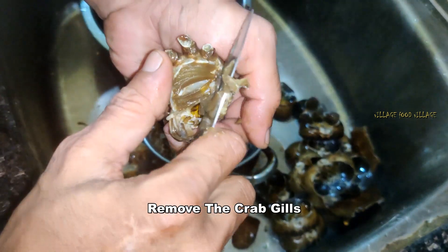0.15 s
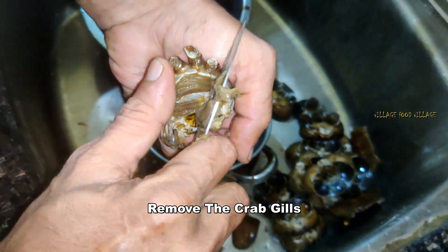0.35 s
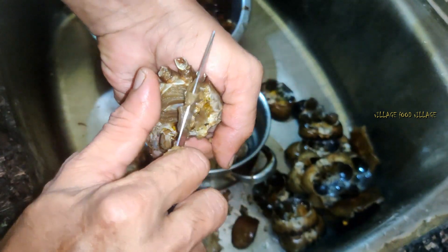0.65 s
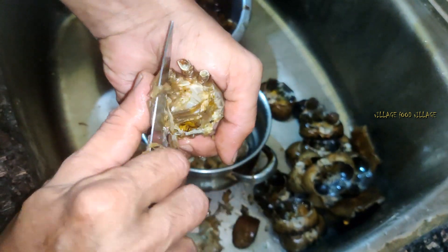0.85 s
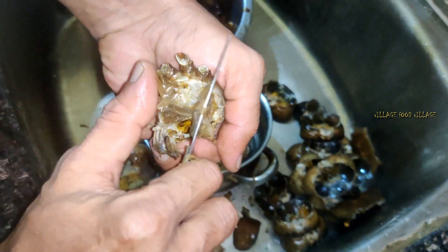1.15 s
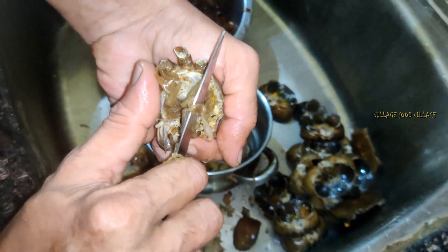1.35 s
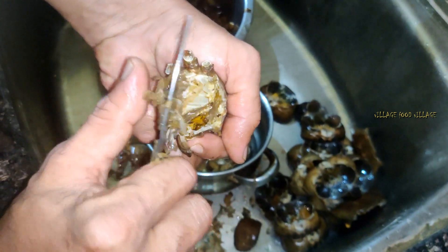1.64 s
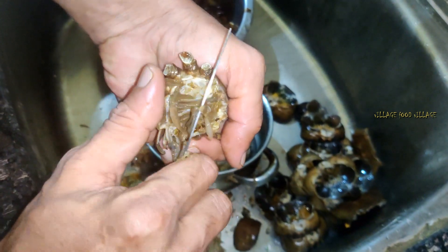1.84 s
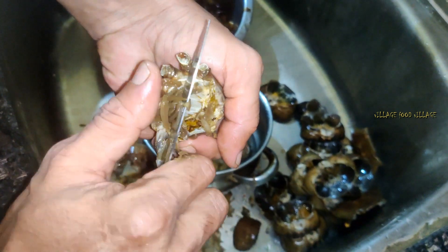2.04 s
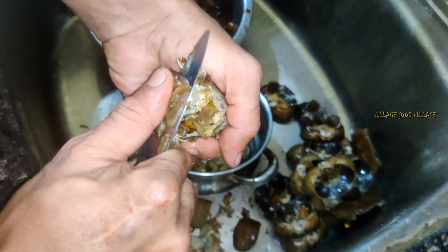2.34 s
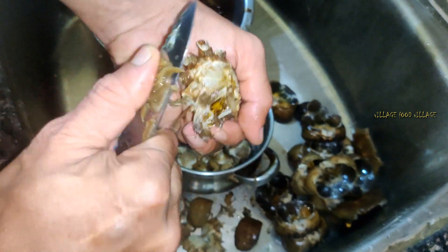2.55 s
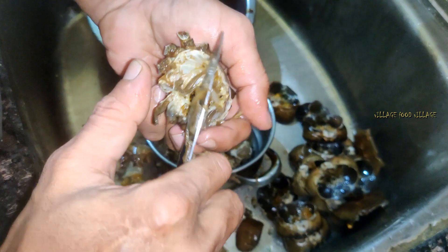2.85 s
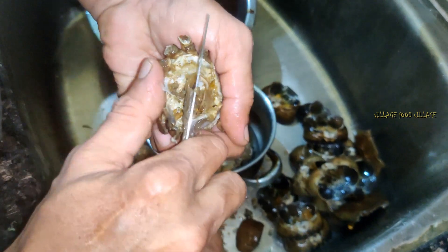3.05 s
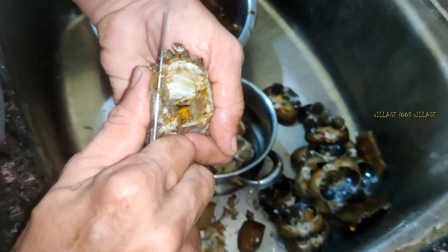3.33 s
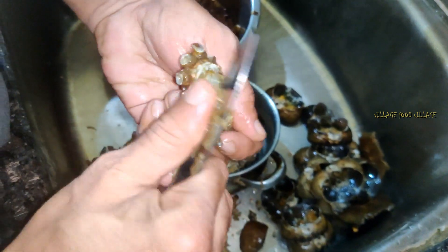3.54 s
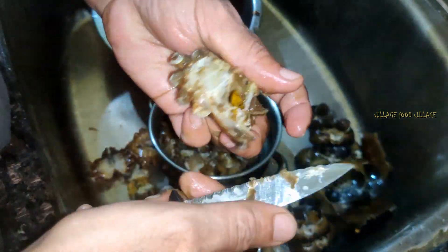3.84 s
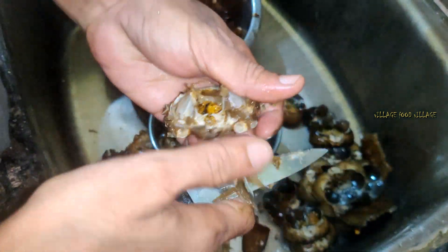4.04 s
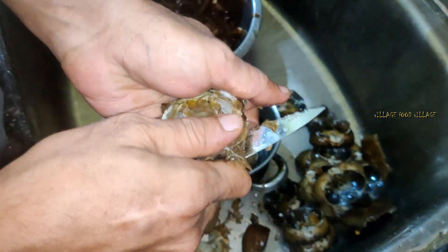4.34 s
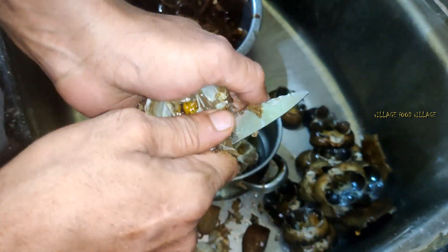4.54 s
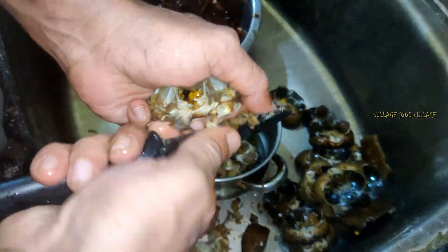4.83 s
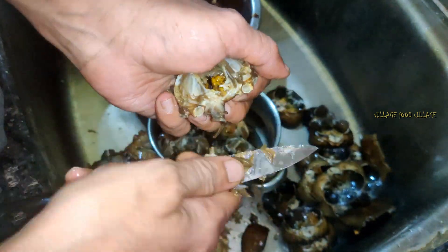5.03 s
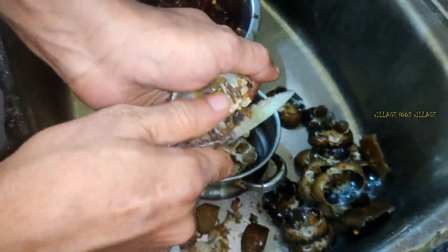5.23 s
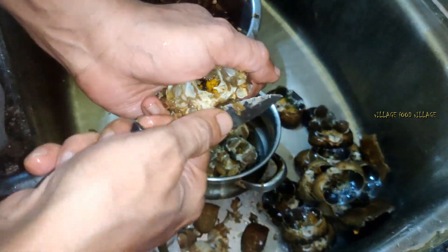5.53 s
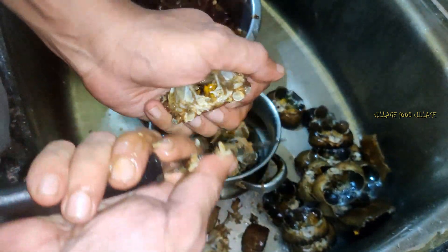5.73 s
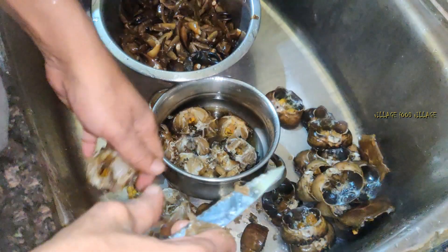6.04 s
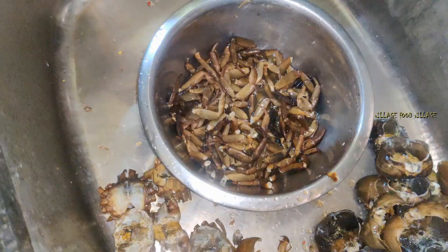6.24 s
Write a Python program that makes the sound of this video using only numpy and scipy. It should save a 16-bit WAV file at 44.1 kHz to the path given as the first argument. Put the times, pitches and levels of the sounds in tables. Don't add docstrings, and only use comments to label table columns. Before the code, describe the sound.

Steady hum and hiss with faint passing traffic. Close up, a blade chips and breaks small crab shells, giving dry, crisp, hollow-ringing cracks scattered left and right, with brief scratchy rubs between. Two soft knocks of dropped scraps echo from farther off. After the last hard snaps comes a quick flurry of wooden pounder blows on stone, heavy and dull, abruptly cut to bare background. The hard kitchen adds a short echo.

```python
import sys
import numpy as np
from scipy import signal
from scipy.fft import rfft, irfft
from scipy.io import wavfile
from scipy.ndimage import uniform_filter1d

SR = 44100
rng = np.random.default_rng(int(sys.argv[2]) if len(sys.argv) > 2 else 0)


def gain_from_db(level_db):
    decades = np.asarray(level_db, float) / 20
    return 10 ** decades


def pcm_store(signal):
    levels = np.round(np.clip(np.atleast_2d(signal), -1, 1) * 32767)
    wavfile.write(sys.argv[1], SR, levels.astype(np.int16).T)


N = 281358
CUT_S = 6.2685

# start_s, peak_db, heavy_thud_db, crack_db, contact_brightness_hz
POUNDER_BLOWS = [
    (6.1943, -11.5, -19, -14, 800),
    (6.203, -13.5, -7, -11, 645),
    (6.2373, -14, 13.5, -16, 3060),
    (6.2366, -14, 11, 7.5, 2520),
    (6.25, -20, -1, -10, 2520),
    (6.264, -16, -6, -3, 2510),
]


def rms_one(x):
    return x / np.sqrt(np.mean(x ** 2) + 1e-20)


def at_hz(points, hz):
    pitch_hz, value = np.array(points)[:, 0], np.array(points)[:, 1]
    return np.interp(np.log(hz + 1), np.log(pitch_hz), value)


def drift(rate):
    r = np.exp(-80 * np.pi * rate / SR)
    slow = signal.lfilter([1], [1, -2 * r, r * r], rng.standard_normal(N // 40 + 2002))
    slow = rms_one(slow[2000:])
    return np.interp(np.arange(N) / 40, np.arange(len(slow)), slow)


def band(x, low_hz, high_hz):
    return signal.sosfilt(signal.butter(2, [low_hz, high_hz], "band", fs=SR, output="sos"), x)


def ring(clicks, hz, t60):
    r, w = gain_from_db(-60 / (t60 * SR)), 2 * np.pi * hz / SR
    return signal.lfilter([0, np.sin(w)], [1, -2 * r * np.cos(w), r * r], clicks + 1e-18)


def diffuse_noise(spectrum):
    # pitch_hz, likeness (0 to 1)
    likeness = [(60, 0.83), (180, 0.85), (300, 0.6), (640, 0.36), (1400, 0.047), (15000, 0.019)]
    hz = np.fft.rfftfreq(N, 1 / SR)
    alike = np.clip(at_hz(likeness, hz), 0, 1)
    mid, side = rfft(rng.standard_normal((2, N)))
    pair = np.sqrt(1 + alike) * mid + np.sqrt(1 - alike) * side * [[1], [-1]]
    return rms_one(irfft(pair * gain_from_db(at_hz(spectrum, hz)), N))


def grit(size, per_s, spread_db):
    sizes = gain_from_db(spread_db * np.minimum(rng.exponential(1, (2, size)), 4))
    sizes = sizes * rng.choice([-1, 1], (2, size))
    return rms_one(sizes * (rng.random((2, size)) < per_s / SR))


def burst(grains, s, t60, rise_s):
    out, start = np.zeros_like(grains), round(s * SR)
    age = np.arange(min(N - start, SR // 2)) / SR
    here = slice(start, start + len(age))
    out[:, here] = grains[:, here] * gain_from_db(-60 * age / t60) * (1 - np.exp(-age / rise_s))
    return out


def mains_hum(seconds):
    hum_hz = 99.2
    first_swell_s, beats_per_s, sag_per_s2 = 0.098, 2.9, 0.1544
    age = seconds - first_swell_s
    beats = (beats_per_s - sag_per_s2 * age / 2) * age
    motor_gain = gain_from_db(-62 + 55.5 + 1.2 * drift(2.2))
    motor = motor_gain * np.sin(2 * np.pi * (hum_hz * seconds - beats) + 0.45 * drift(0.58))
    return np.sqrt(2) * (np.sin(2 * np.pi * hum_hz * seconds) + motor)


def background(knife_dry):
    # pitch_hz, level_db per Hz
    rumble_colour = [(15, 6), (31, -2), (69, -12.5), (102, -2.5), (162, -8.5), (314, -14.5), (600, -21.5),
                     (900, -61)]
    # pitch_hz, level_db per Hz
    street_colour = [(200, -0.5), (400, -1.5), (800, 4), (1300, -2.5), (2500, -4.5), (5000, -23)]
    # pitch_hz, level_db per Hz
    hiss_colour = [(500, -10.5), (1500, -1), (3000, 1), (6000, 1), (10000, -0.5), (13000, -2.5),
                   (15500, -0.5), (17500, -10.5)]
    # middle_s, street_db, rumble_db, half_width_s
    passes = [
        (0.01, -60, -54, 0.12),
        (0.9, -92, -58, 0.13),
        (2.42, -61.5, -65, 0.33),
        (3.8, -57, -49.5, 0.24),
        (5.11, -55, -55, 0.18),
        (5.6, -63.5, -58, 0.9),
    ]
    # hum_db, rumble_db, street_db, hiss_db
    after_cut = (-54.5, -56.5, -62, -56.5)
    hum_db, rumble_db, street_db, hiss_db = -55.5, -56.5, -67, -52
    house_t60_s, house_db = 1.23, -11
    slide_db, slide_db_per_s = -49.5, 114
    seconds = np.arange(N) / SR

    rumble, street = gain_from_db(2 * rumble_db), gain_from_db(2 * street_db)
    for s, pass_street_db, pass_rumble_db, half_s in passes:
        nearness = 1 / (1 + ((seconds - s) / half_s) ** 2)
        rumble = rumble + gain_from_db(2 * pass_rumble_db) * nearness
        street = street + gain_from_db(2 * pass_street_db) * nearness

    from_touch_s = np.abs(seconds - POUNDER_BLOWS[0][0])
    street = street + gain_from_db(2 * (slide_db - slide_db_per_s * from_touch_s))

    keep = gain_from_db(-120 / (house_t60_s * SR))
    knife_power = np.mean(knife_dry ** 2, axis=0)
    house = signal.lfilter([1 - keep], [1, -keep], knife_power)
    hiss = gain_from_db(2 * hiss_db) + gain_from_db(2 * house_db) * house

    levels = zip((gain_from_db(2 * hum_db), rumble, street, hiss), after_cut)
    hum_gain, rumble_gain, street_gain, hiss_gain = [
        np.where(seconds < CUT_S, np.sqrt(power), gain_from_db(after_db)) for power, after_db in levels]
    out = gain_from_db(-3.5) * hum_gain * mains_hum(seconds) * gain_from_db([[-.8], [.8]])
    out = out + rumble_gain * diffuse_noise(rumble_colour)
    out = out + street_gain * diffuse_noise(street_colour)
    return out + hiss_gain * gain_from_db(-4.5 + .5 * drift(4.6)) * diffuse_noise(hiss_colour)


def drops():
    # start_s, peak_db
    falls = [
        (2.572, -37),
        (2.61, -65),
        (3.73, -35),
        (3.758, -52),
    ]
    # pitch_hz, level_db per Hz
    knock_colour = [(200, -10), (330, -4.5), (480, 3), (800, -2), (1300, -8.5), (2500, -7.5), (4500, -25)]
    noise = diffuse_noise(knock_colour) * gain_from_db(2.3 * drift(38))
    return sum(gain_from_db(db - 4.5) * burst(noise, s, 0.38, rise_s=0.00044) for s, db in falls)


def kitchen(x):
    t60_s = 0.28
    age = np.arange(round(0.6 * SR)) / SR
    noise = rng.standard_normal((2, len(age))) * (1 - np.exp(-age / 0.0083))
    dull = band(noise, 124, 3000) * gain_from_db(-60 * age / t60_s)
    bright = band(noise, 3560, 8700) * gain_from_db(-60 * age / (0.38 * t60_s))
    tail = (dull + bright) / np.sqrt(np.sum(bright[0] ** 2))
    return signal.fftconvolve(x, tail, axes=1)[:, :N]


def pounder():
    # pitch_hz, level_db, t60_s
    counter = [(127, -17, 0.055), (192.4, 6, 0.048), (232, -11, 0.055), (347, -1, 0.022), (540, -7, 0.28),
               (655, -12, 0.18), (780, 2.5, 0.028), (898, 5, 0.02), (1069, 0, .06), (1225, 7, 0.032),
               (1346, 1.5, 0.031), (1675, -2, 0.031), (1880, -1, 0.027), (2210, -1.5, 0.03)]
    out, grains = np.zeros((2, N)), grit(N, per_s=5500, spread_db=0.5)
    for s, peak_db, thud_db, crack_db, contact_hz in POUNDER_BLOWS:
        shake = gain_from_db(peak_db) * burst(grains, s, .02, rise_s=0.00043)
        soft = band(shake + 0.5 * shake[::-1], 240, contact_hz)
        push = gain_from_db(peak_db + thud_db - 11) * burst(np.ones((2, N)), s, 0.0043, rise_s=0.00031)
        for hz, db, t60 in counter:
            out += gain_from_db(db - 28.5) * ring(push if hz < 300 else soft, hz, t60)
        out += gain_from_db(crack_db - 6.5) * band(shake, 2200, 10500)
    return band(out, 95, 16000) * gain_from_db([[.7], [-.7]])


def cracks():
    # start_s, peak_db, hollowness_db, left_right_db
    rim_cracks = [(1.5232, -18, -1, 5.5), (1.5333, -20, 1.5, -13), (1.8887, -18, 0.5, 1),
                  (1.9405, -9.5, -4, 2.5), (3.1837, -21, -4, 21.5), (3.1855, -1.6, 2, 0.5),
                  (3.2316, -13, -4.5, -15.5), (3.2566, -24, -3, -6), (3.2825, -31, -8, -8),
                  (3.484, -8.5, -0.5, 1.5), (3.6421, -30.5, -8, 10), (3.6675, -28, -5, 7),
                  (3.7457, -20, 8, 3), (4.7797, -4, -1.5, -4), (4.7995, -33, 9, 6), (4.8667, -25, 0, -0.5),
                  (4.8813, -19, -6, 6.5), (4.8956, -24, 6, 0), (5.532, -13.5, -3, -11),
                  (5.673, -28, -6, -9), (5.7375, -5.5, 3.5, 3)]
    # start_s, peak_db, hollowness_db, left_right_db
    body_cracks = [(0.8752, -18.5, -6.5, 5.5), (1.4216, -27.5, 2, 3.5), (1.9769, -26, 0, 9),
                   (2.236, -28, -9, 0.5), (2.4339, -19, -2.5, -0.5), (3.0934, -39, 2, 4),
                   (3.2375, -17, -0.5, 8), (3.4182, -33, -3, 1), (3.4533, -7.5, 2.5, -9.5),
                   (3.4995, -17, 1, 7.5), (3.6148, -21.5, 1, 6.5), (3.675, -29.5, -8, 16.5),
                   (3.733, -25, -4, 4), (3.7596, -23.5, -4, 4.5), (4.2318, -25.5, -5, 11),
                   (4.3358, -33, 2, 1.5), (4.4534, -28.5, -1.5, -3), (4.7049, -17.5, -3.5, -2),
                   (4.7333, -12.5, -4.5, -7.5), (5.358, -25, -3, 1), (5.372, -19, -7.5, -11),
                   (5.431, -33, -15, -7.5), (5.472, -26.5, 1, -13.5), (5.4925, -21.5, 5, -2),
                   (5.539, -13, 3, 6.5), (5.5697, 0, -16, 1.5)]
    rim, body = (4150, -19.5, -15), (1977, -18, -23)
    middling_db, ring_per_db, sizzle_per_db, pitch_scatter = -20, -0.3132, 0.0022, 0.032

    both = rim_cracks + body_cracks
    splinters = [(s + .013, db - 21, 0, -pan_db) for s, db, _, pan_db in both]
    kinds = [rim] * len(rim_cracks) + [body] * len(body_cracks) + [rim] * len(both)
    chance = rng.uniform(-1, 1, len(kinds))
    rows = []
    for crack, kind, c in zip(both + splinters, kinds, chance):
        s, db, hollow_db, pan_db = crack
        hz, ring_db, sizzle_db = kind
        harder_db = db - middling_db
        rows.append((s, db, hz * (1 + pitch_scatter * c), ring_db + hollow_db + ring_per_db * harder_db,
                     sizzle_db + sizzle_per_db * harder_db, pan_db))
    return rows


def knife():
    # start_s, length_s, level_db
    scrapes = [
        (1.936, 0.071, -36),
        (2.436, 0.034, -39),
        (3.215, 0.058, -37),
        (3.603, 0.062, -36.5),
        (3.665, 0.054, -36.5),
        (3.72, 0.084, -36.5),
        (4.79, 0.064, -40),
        (5.455, 0.042, -38),
        (5.578, .06, -52),
    ]
    # pitch_hz, level_db, t60_s
    shell_tones = [(800, -16.5, 0.035), (1220, -9, 0.029), (1600, 12, 0.0086), (2080, -1, 0.046),
                   (3670, 9, 0.025)]
    # start_s, level_db, pitch_hz, t60_s
    blade_rings = [
        (3.236, -30, 5650, 0.089),
        (1.534, -42, 4030, 0.1),
    ]

    grains = grit(N, per_s=9000, spread_db=6.0)
    snap, sizzle, body, hollow = np.zeros((4, 2, N))
    age = np.arange(SR // 8) / SR
    rise = 1 - np.exp(-age / .0004)
    shape = rise * (gain_from_db(-60 * age / .023) + gain_from_db(-3.0 - 60 * age / 0.0038))
    for s, peak_db, ring_hz, ring_db, sizzle_db, pan_db in cracks():
        start = round((s - .0005) * SR)
        here = slice(start, start + len(age))
        spray = gain_from_db(peak_db) * shape * grains[:, here] * gain_from_db([[0.92 * pan_db], [-.4 * pan_db]])
        snap[:, here] += spray
        sizzle[:, here] += gain_from_db(sizzle_db) * spray
        body[:, here] += gain_from_db(ring_db) * spray
        hollow[:, here] += gain_from_db(ring_db - 19.0) * ring(spray + 0.99 * spray[::-1], ring_hz, t60=0.015)

    seconds, wet = np.arange(N) / SR, grit(N, per_s=6000, spread_db=3.5)
    for s, length_s, db in scrapes:
        level_db = db - 10 * np.clip((seconds - s) / length_s, 0, 1)
        inside = np.clip(np.minimum(seconds - s, s + length_s - seconds) / 0.0077, 0, 1)
        rub = inside * gain_from_db(level_db + 5 + 1.2 * drift(50)) * wet
        snap = snap + rub
        sizzle = sizzle + gain_from_db(-13.5) * rub
        body = body + gain_from_db(-18.0) * rub

    shell = hollow + sum(gain_from_db(db - 31.5) * ring(body, hz, t60) for hz, db, t60 in shell_tones)
    blade = np.zeros((2, N))
    for s, db, hz, t60 in blade_rings:
        blade += gain_from_db(db - 10.5) * ring(burst(wet, s, t60, rise_s=0.0013), hz, t60=0.007)
    top = gain_from_db(5) * band(sizzle, 11000, 16500)
    return gain_from_db(-10) * band(snap, 3870, 12900) + top + shell + blade


def scene():
    knife_dry, blows = knife(), pounder()
    near = knife_dry + gain_from_db(-16.5) * kitchen(knife_dry)
    near = near + blows + gain_from_db(-10.0) * kitchen(band(blows, 344, 16000)) + drops()
    after = np.arange(N) / SR - CUT_S
    leak = gain_from_db(-13.5 - 540 * np.maximum(after, 0))
    return band(near * np.where(after < 0, 1, leak), 90, 18000) + background(knife_dry)


def port(x, peaks):
    for hz, width, db in peaks:
        w, a = 2 * np.pi * hz / SR, gain_from_db(db / 2)
        k = np.sin(w) * width / hz / 2
        x = signal.lfilter([1 + k * a, -2 * np.cos(w), 1 - k * a], [1 + k / a, -2 * np.cos(w), 1 - k / a], x)
    return x


def drop_weak_bands(x):
    # pitch_hz, left_db, right_db
    dropping = [(1500, -9, -9), (2400, -1.8, -2.0), (3500, -.6, -.6), (4800, -1.8, -1.3),
                (6000, -4.5, -4.5), (7500, -2.5, -6), (9000, -.6, -6), (15700, -.6, -3.5)]
    top_hz, top_margin_db, safe_db = 15900, 24, 5
    hz, _, spec = signal.stft(x, SR, "cosine", nperseg=2048, noverlap=1024)
    hz, power = hz[:1024], np.abs(spec[:, :1024]) ** 2
    bands = power.reshape(2, 128, 8, -1).mean(axis=2)
    bands = uniform_filter1d(bands, size=2, axis=2)
    usual = np.median(bands, axis=2, keepdims=True)
    level_db = 10 * np.log10(bands / usual + 1e-20)
    around_db = uniform_filter1d(level_db, size=7, axis=1)
    table, centres = np.array(dropping), hz[4::8]
    margin_db = np.array([at_hz(table[:, [0, side]], centres) for side in (1, 2)])[..., None]
    keep = (level_db > around_db + margin_db) | (level_db > safe_db)
    keep = keep | (centres < table[0, 0])[:, None]
    keep = np.where((centres > top_hz)[:, None], level_db > top_margin_db, keep)
    spec[:, :1024] *= np.repeat(keep, 8, axis=1)
    return signal.istft(spec, SR, "cosine", nperseg=2048, noverlap=1024)[1][:, :N]


def top_cut(x):
    return signal.sosfilt(signal.butter(12, 16980, fs=SR, output="sos"), x)


def record(dry):
    # pitch_hz, width_hz, level_db
    left_port = [(2730, 350, -11.5), (6000, 2600, 14), (9830, 5300, -10), (14200, 12000, -2)]
    # pitch_hz, width_hz, level_db
    right_port = [(6000, 210, 1), (8780, 3680, 18.83), (14700, 4600, 7.2)]
    x = np.tanh([port(dry[0], left_port), port(dry[1], right_port)])
    x = signal.sosfilt(signal.cheby2(12, 50, 17000, fs=SR, output="sos"), x)
    mix = drop_weak_bands(x)
    return top_cut(mix)


dry = scene()
out = record(dry)
pcm_store(out)
```